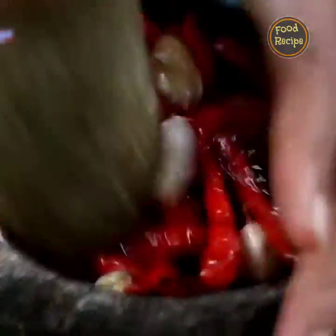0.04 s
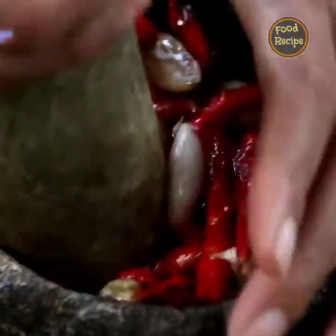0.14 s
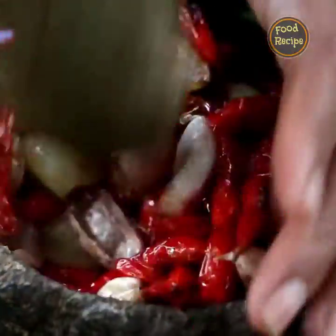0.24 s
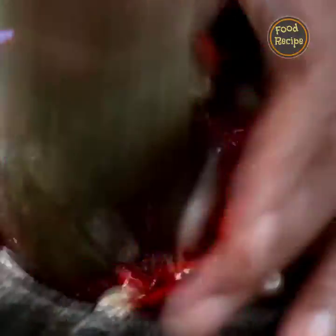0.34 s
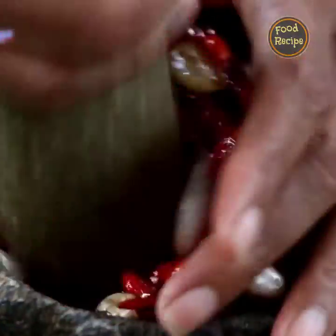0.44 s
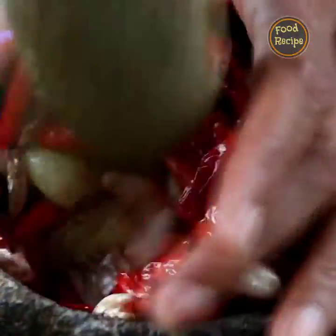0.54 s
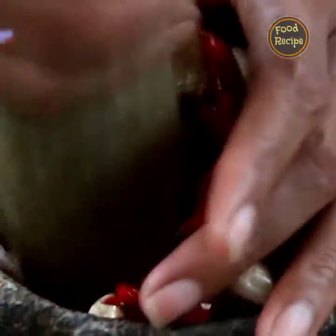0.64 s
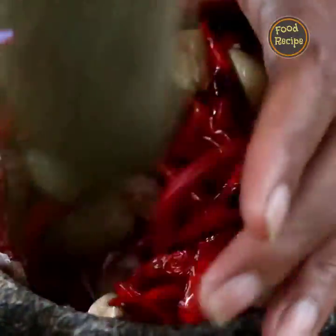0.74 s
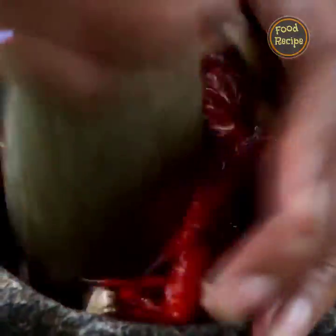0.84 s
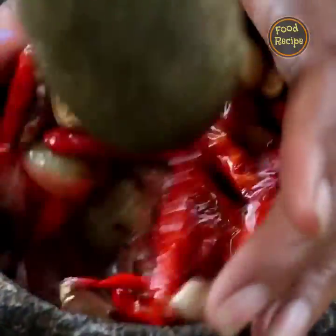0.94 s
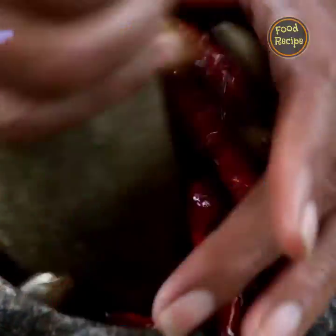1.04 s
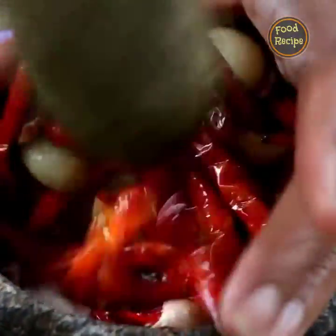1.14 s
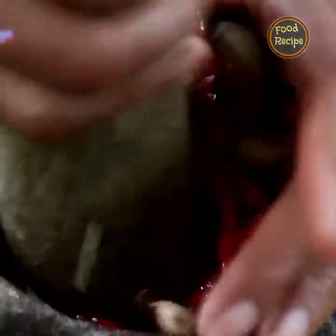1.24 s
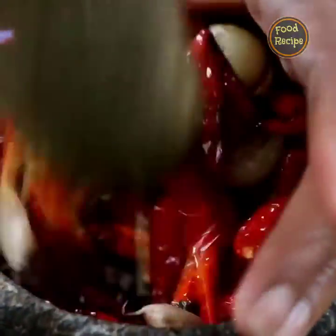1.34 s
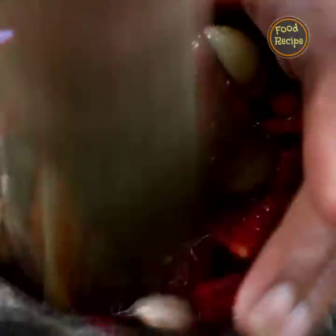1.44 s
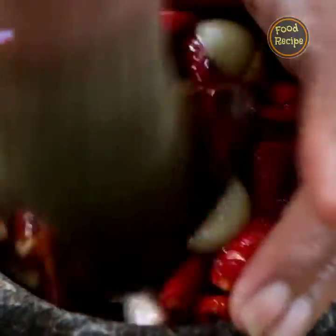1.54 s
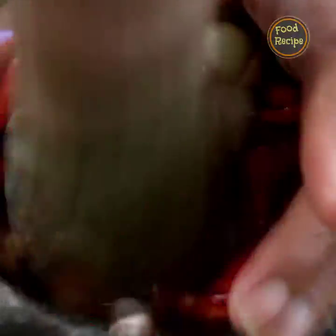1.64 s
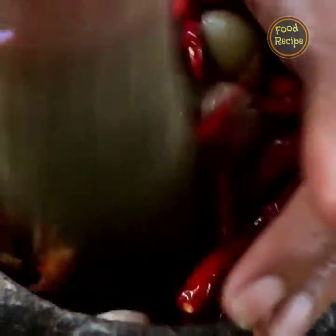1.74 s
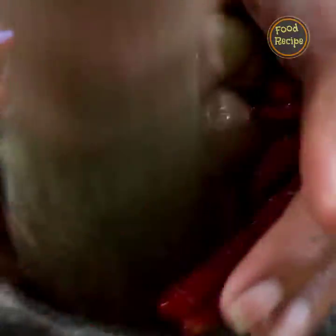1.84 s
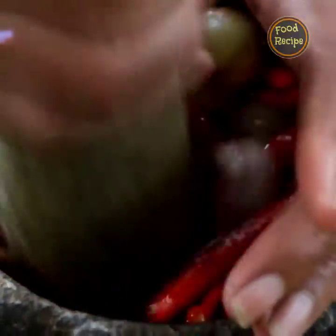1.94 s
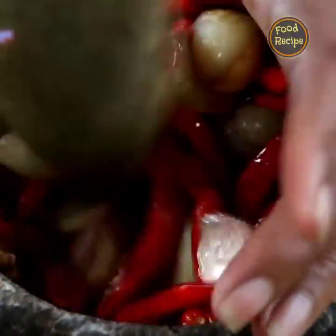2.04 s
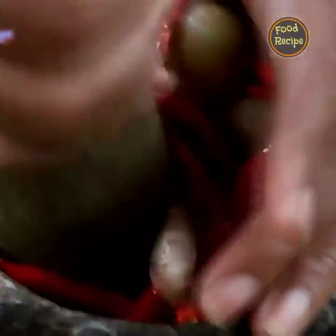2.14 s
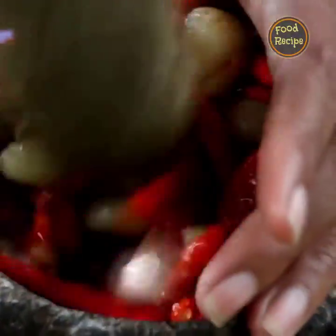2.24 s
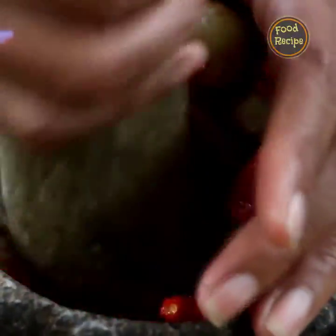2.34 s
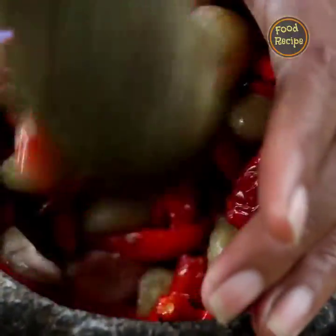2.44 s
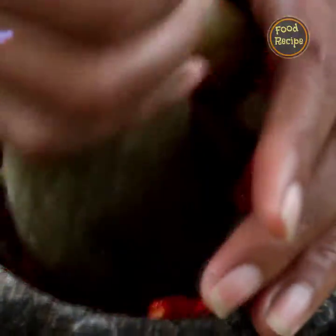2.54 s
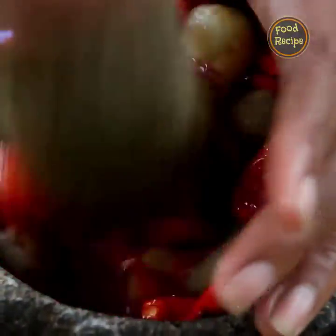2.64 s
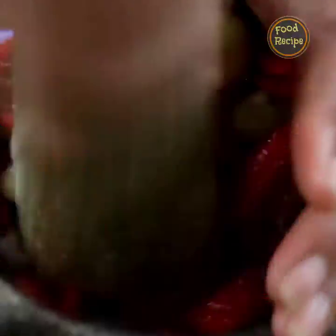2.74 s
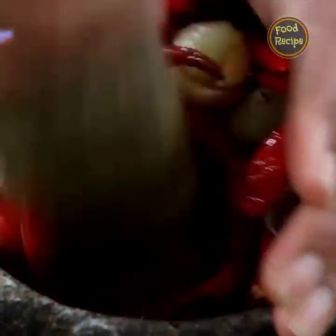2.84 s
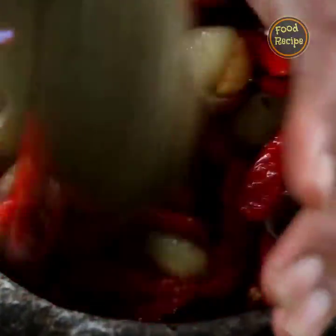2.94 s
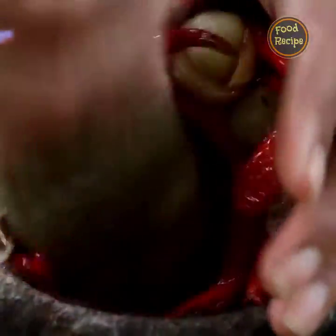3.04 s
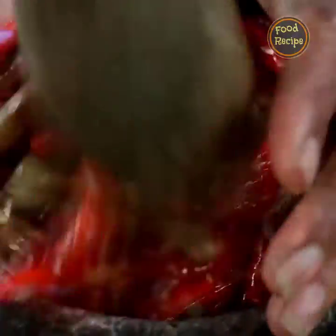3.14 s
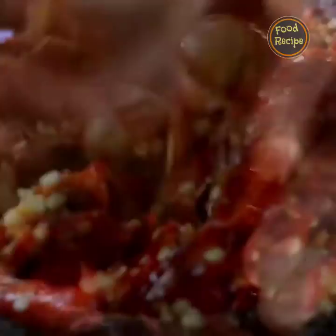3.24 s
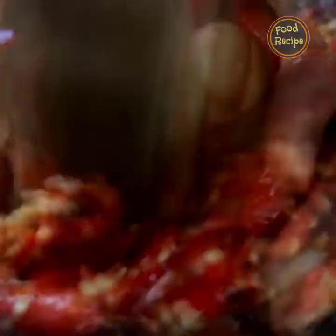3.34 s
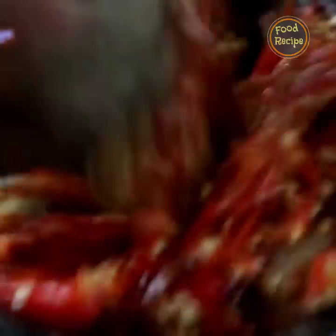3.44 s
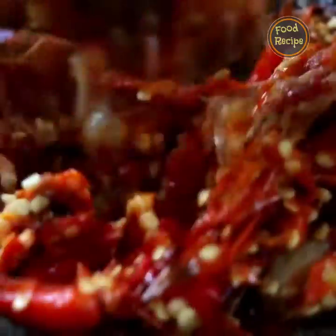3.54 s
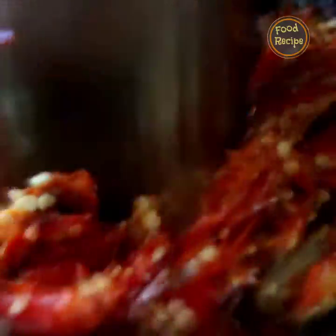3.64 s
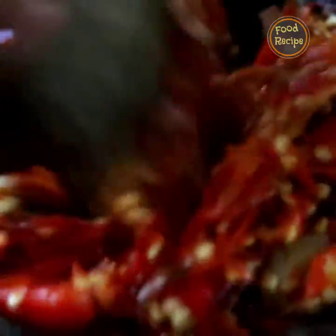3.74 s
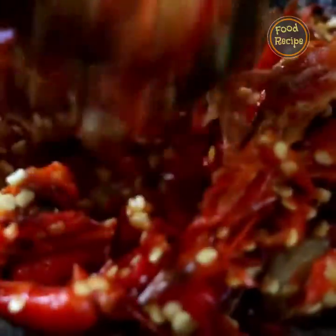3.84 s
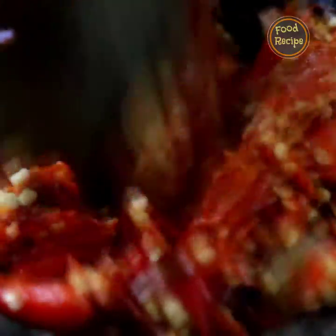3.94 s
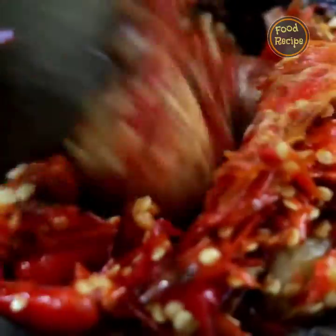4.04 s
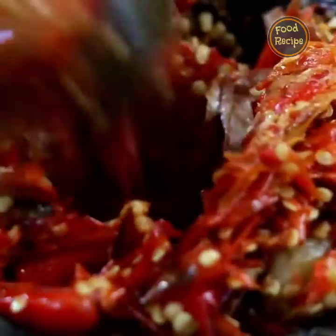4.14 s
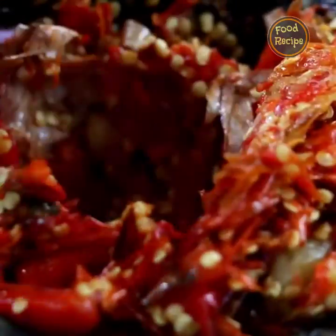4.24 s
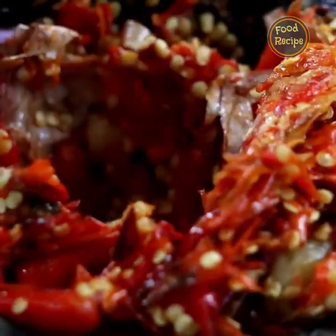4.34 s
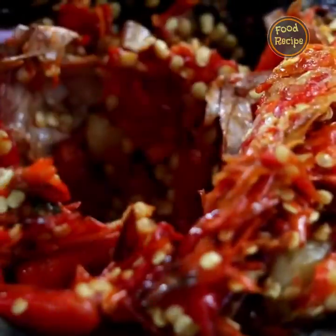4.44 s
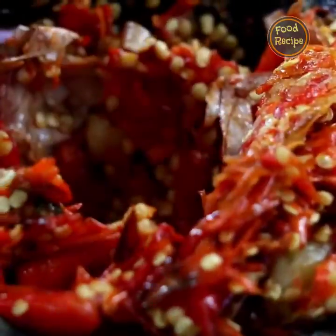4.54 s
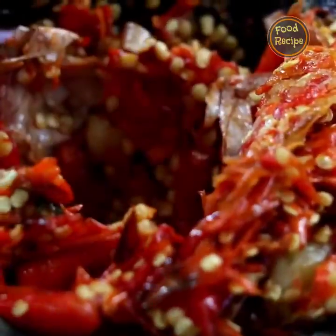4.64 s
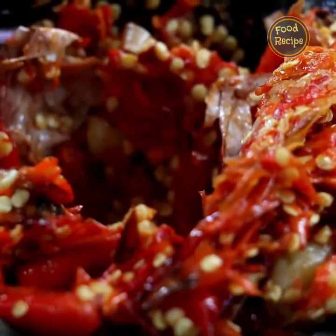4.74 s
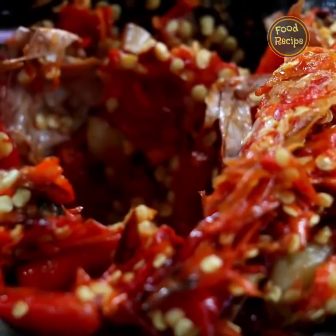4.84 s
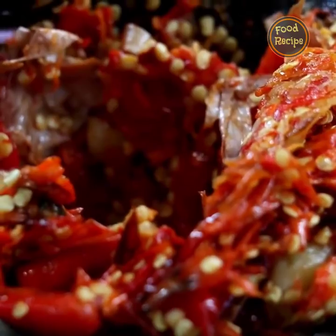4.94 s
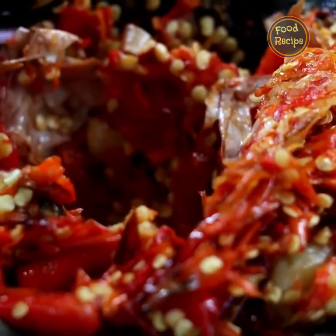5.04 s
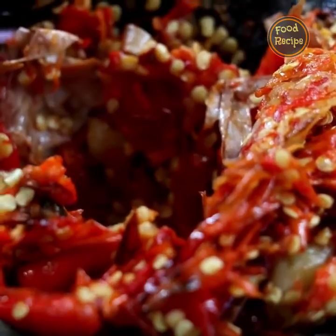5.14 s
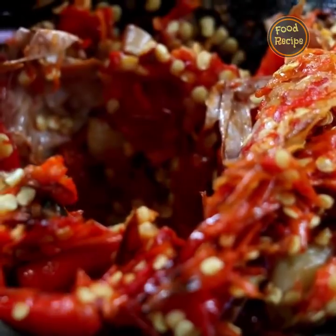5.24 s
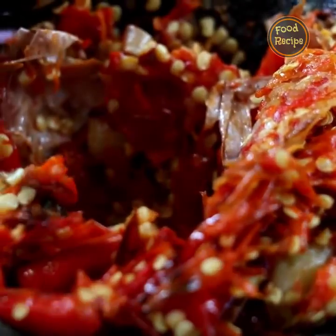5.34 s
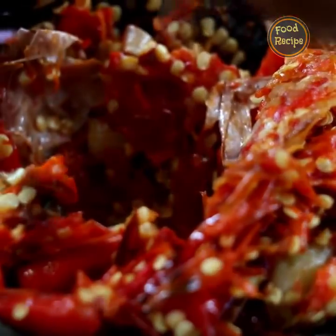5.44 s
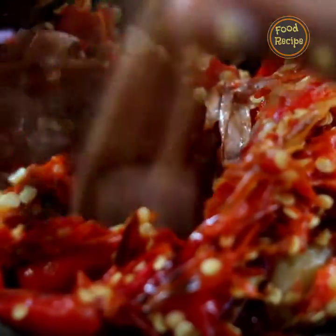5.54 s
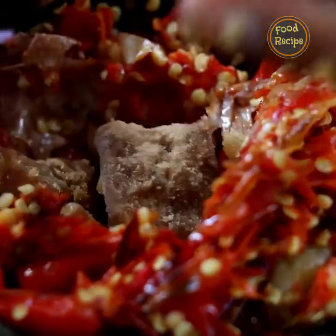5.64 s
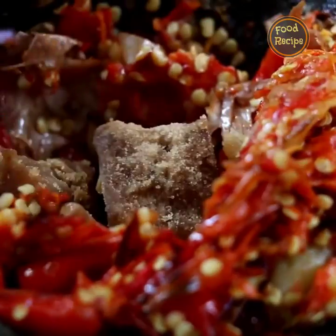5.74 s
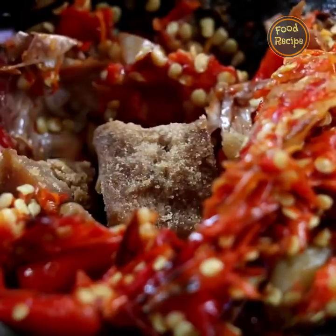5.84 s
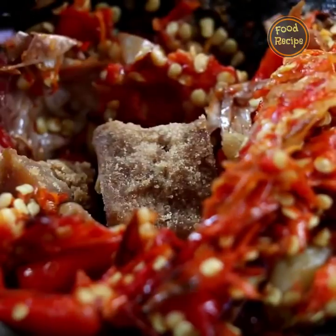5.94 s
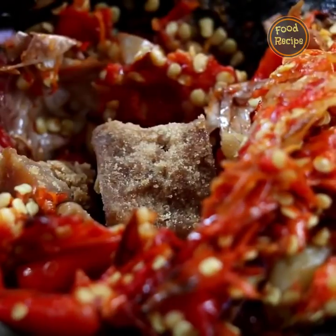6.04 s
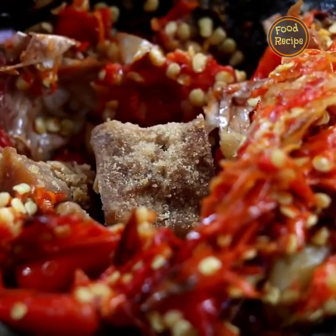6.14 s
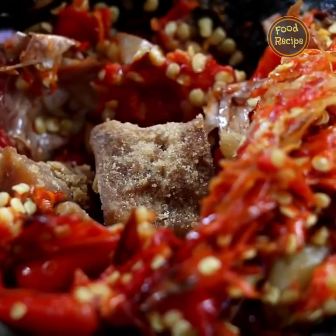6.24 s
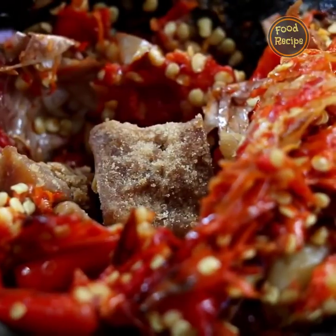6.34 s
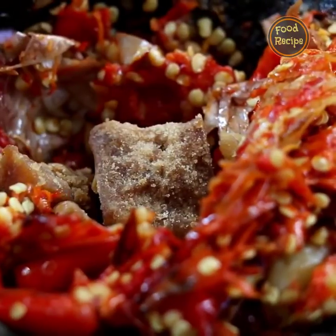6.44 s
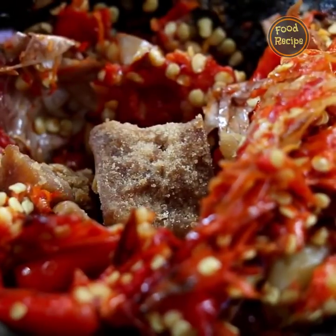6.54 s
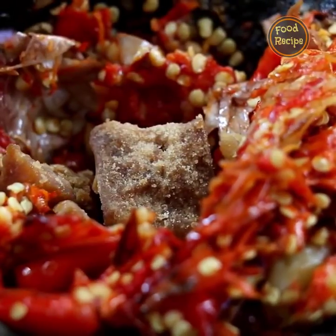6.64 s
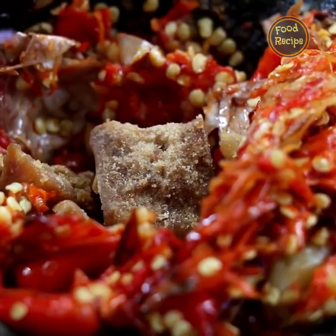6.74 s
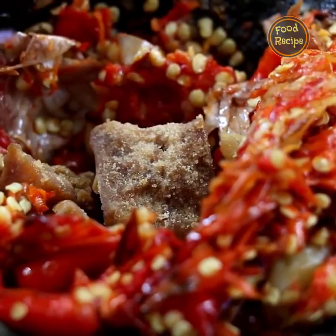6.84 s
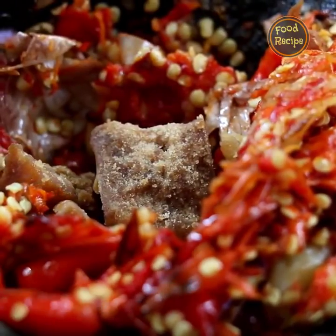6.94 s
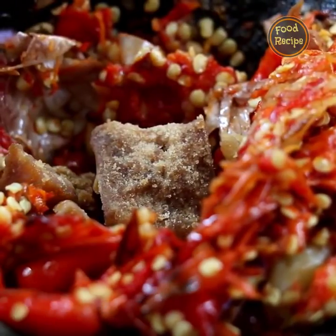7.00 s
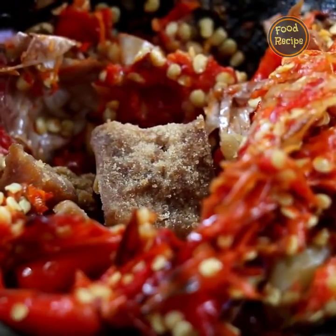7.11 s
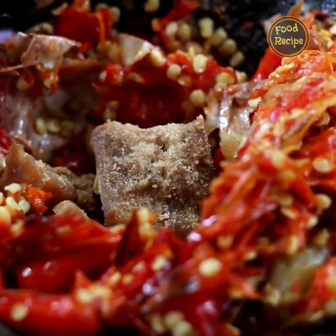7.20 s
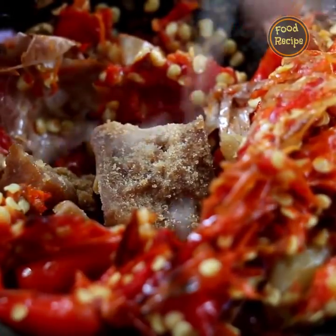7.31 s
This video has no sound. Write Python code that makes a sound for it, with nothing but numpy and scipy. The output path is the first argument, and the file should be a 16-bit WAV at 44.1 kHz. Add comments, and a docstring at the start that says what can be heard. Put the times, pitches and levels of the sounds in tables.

```python
"""Pounding chillies in a stone mortar

Close by and outdoors, a stone pestle pounds chillies and garlic. Each blow crushes skins and flesh
in a burst of tiny cracks and thumps the bowl on its base; where stone meets stone, it knocks.
Then two lumps of sugar drop in. Insects shrill and small birds call all around, over a soft hiss of air."""
import sys
import numpy as np
from scipy import signal
from scipy.fft import rfft, irfft
from scipy.io import wavfile

SR = 44100
rng = np.random.default_rng(int(sys.argv[2]) if len(sys.argv) > 2 else 0)


def unload_audio(sound):
    """Save the sound as a 16-bit wav file, at the path given as the first command line argument."""
    columns = np.transpose(np.atleast_2d(sound))
    # keep every value between -1 and 1, then stretch to whole-number steps
    steps = np.round(np.clip(columns, -1, 1) * 32767)
    wavfile.write(sys.argv[1], SR, steps.astype(np.int16))


N = 325017


# the tones of the filled stone bowl: f/Hz, level/dB, ring time before stretching/s
BOWL_TONES = [(520, -2, 0.0059), (843, -11.5, 0.0038), (1155, -2.5, 0.0046), (1460, 1.5, 0.0065),
              (2100, -6, 0.0051), (2840, 8.5, 0.0029), (4180, -2, 0.0059), (5200, -4, 0.0054),
              (6770, -12, 0.0019), (7860, -7.5, 0.0067), (12170, -14, 0.0051)]
def knock(db, bright_hz, narrow_db, stretch, spot_db=2.0, grit_db=-11, grit_s=.0003):
    """Stone on stone rings very briefly; the thinner the cushion of pulp, the brighter the knock."""
    t = np.arange(SR // 200) / SR
    grit = rng.standard_normal(len(t)) * np.exp(-t / grit_s)  # rough faces touch at many points
    contact = (t == 0) + amp(grit_db) * grit / np.linalg.norm(grit)
    spot = rng.standard_normal(len(BOWL_TONES))  # each spot of the bowl favours other tones
    tones = [(hz, tone_db + spot_db * luck, t60) for (hz, tone_db, t60), luck in zip(BOWL_TONES, spot)]
    ringing = np.convolve(contact, ring(tones, stretch, rise_cycles=1.2))
    sound = colour(ringing, lambda hz: -narrow_db * np.log1p(np.log2(hz / bright_hz) ** 2))
    return amp(db) * sound / abs(sound).max()


# blows that reach the stone: t/s, peak level/dB, favoured f/Hz, cut away from that pitch/dB,
# ring time stretch, bounce time/ms, level of the bounce's crunch/dB
STONE_HITS = [(0.5811, 2.5, 2580, 11.5, 0.79, 15, -45), (0.7863, -1, 2400, 4, 1.6, 12, -21.5),
              (1.013, -10, 1730, 13, 1.1, 4.9, -31), (1.4451, 5, 1580, 5, 1.25, 7.7, -25.5),
              (1.6589, -4.5, 1990, 15, 0.62, 7.9, -28), (1.869, -2.5, 2100, 11, 0.73, 9.8, -26.5),
              (2.5391, -9, 4970, 8, 0.36, 5.8, -48), (2.982, -11.5, 4070, 11, 0.57, 12, -56),
              (3.2045, -3.5, 6400, 14.5, 0.59, 8, -52), (3.356, -12.5, 2000, 6, .6, 9.1, -48),
              (3.4178, -22.5, 1200, 9, .62, 12, -34.5), (3.6464, -14, 620, 5, 0.41, 14, -46)]
def pestle_knocks(bounce_boost_db=7.5):
    """The pestle strikes the bowl, bounces and lands again more softly."""
    out = np.zeros(N)
    for s, db, bright_hz, narrow_db, stretch, bounce_ms, bounce_db in STONE_HITS:
        add(out, s, knock(db, bright_hz, narrow_db, stretch))
        landing = knock(bounce_db + bounce_boost_db, bright_hz=1450, narrow_db=7, stretch=1.2)
        add(out, s + bounce_ms / 1000, landing)
    return out


# how strong the crushing is at each pitch: f/Hz, level/dB
CRUNCH_COLOUR = [(100, -32.5), (380, -7.5), (900, -13.5), (1200, -7), (1480, 4), (1750, -2.5), (2080, 4.5),
                 (2500, -0.5), (3500, -0.5), (5800, 1), (8500, -2.5), (10500, -11.5), (16000, -17)]
def crunch(swell, db, tilt_db, cracks_per_s=5500, spread_db=4.5, clump_db=1.5, wall_hz=710):
    """Cells burst in clumps of tiny cracks as the swell presses them; more tilt means more treble."""
    n = len(swell)
    happens = rng.random(n) < cracks_per_s / SR
    size = amp(spread_db * np.minimum(rng.exponential(1, n), 3))
    direction = rng.choice([-1, 1], n)
    clumps = amp(clump_db * wander(n, per_s=497))
    cracks = swell * clumps * happens * direction * size
    cracks = cracks + 0.082 * np.roll(cracks, round(SR / wall_hz))  # the wall throws each crack back
    sound = colour(cracks, lambda hz: spectrum(CRUNCH_COLOUR, hz)
                   + tilt_db * np.log2(np.maximum(hz, 900) / 4000))
    return amp(db) * unit(sound) * np.sqrt(np.mean(swell ** 2))


# every blow: t/s, thump level before its boost/dB, crush level/dB, crush fade/ms,
# crush tilt/dB per octave, time to sink in/ms, skin level/dB, skin tilt/dB per octave
PESTLE_BLOWS = [(.3675, -53, -25, 7.5, 2, 9.1, -23.5, 4), (.5818, -42, -29, 6.2, 0, 3.2, -21, 2.5),
                (.7886, -38, -16.5, 1.6, 0, 9, -38, 3), (1.0127, -40.5, -18, 5, 7, 6.5, -22, 0),
                (1.235, -47, -21, 5.2, 5, 9.2, -29, -3), (1.4474, -33, -17, 2.3, 4, 3.6, -40, 12),
                (1.6595, -37, -29, 5, 5, 5.8, -30, -3.5), (1.8705, -39.5, -25.5, 1.4, -8.5, 12, -39, 9),
                (2.105, -44, -21.5, 2.4, 3, 17.5, -23, 7), (2.3191, -41, -22, 4.3, 0.5, 4, -26, 0),
                (2.5414, -33, -14.5, 2.1, 2, 4.3, -25, 2), (2.7637, -36, -26.5, 3.4, 6.5, 12.1, -33, -2),
                (2.9822, -32, -17, 1.74, 0, 8.5, -27.5, -2), (3.068, -37, -35.5, 3, 2, 3.5, -39, 0),
                (3.2042, -34.5, -11, 1.3, 8, 15.7, -31.5, 0.5),
                (3.3572, -23, -24, 2, -6.5, 3.03, -25.5, -4.5),
                (3.4185, -45, -34, 5.3, -3.5, 5.2, -31.5, 5), (3.6463, -18.5, -21.5, 1.5, -3, 3.5, -22, -6)]
# pieces that shift and snap: t/s, level/dB, half length/ms, tilt/dB per octave
LOOSE_PIECES = [(.05, -42.5, 16, 8), (.091, -39.5, 19.3, 3.5), (.197, -42.5, 10, 1),
                (0.352, -31.5, 3.7, 13), (1.1303, -29.5, 0.53, 6.5), (2.304, -33, .7, 3),
                (3.969, -44, 12, -2), (5.132, -43, 1.7, 3), (5.552, -45, 1.7, 4.5)]
def crushing(skin_attack_s=0.00062, skin_release_s=.012, lift_delay_s=.072, lift_fall_db_per_s=4.5):
    """Each blow bursts skins, crushes flesh and lifts out; bounces and loose pieces crackle too."""
    out = np.zeros(N)
    t = np.arange(-SR // 16, SR // 16) / SR
    for s, _, crush_db, fade_ms, tilt_db, sink_ms, skin_db, skin_tilt_db in PESTLE_BLOWS:
        start, sink_s = s + t[0], sink_ms / 1000
        skins = .5 * (1 + np.tanh(t / skin_attack_s))  # skins burst at first touch,
        skins *= np.exp(-np.maximum(t, 0) / (0.84 * sink_s))  # give way as the pestle sinks
        skins *= np.exp(-np.maximum(t - sink_s, 0) / skin_release_s)  # and fall silent once it stops
        add(out, start - sink_s, crunch(skins, skin_db, skin_tilt_db))
        flesh = np.exp(-abs(t) / (fade_ms / 1000))
        add(out, start, crunch(flesh, crush_db, tilt_db))
        lift_db = -45.5 - lift_fall_db_per_s * s  # leaving the wet pulp gets quieter as skins break up
        lift = crunch(bell(t, half_s=0.014), lift_db, tilt_db=2.5, cracks_per_s=2600)
        add(out, start + lift_delay_s, lift)
    for s, *_, bounce_ms, bounce_db in STONE_HITS:
        flight_s = bounce_ms / 1000
        smear = crunch(bell(t, 0.31 * flight_s), bounce_db, tilt_db=3)
        add(out, s + t[0] + flight_s, smear)
    for s, db, half_ms, tilt_db in LOOSE_PIECES:
        add(out, s + t[0], crunch(bell(t, half_ms / 1000), db, tilt_db, cracks_per_s=3000))
    return out


# the low tones of the mortar rocking on its base: f/Hz, level/dB, ring time/s
BASE_TONES = [(201, -0.5, 0.056), (162.6, -6.5, 0.043), (332, 2.5, 0.014), (580, -3, 0.018)]
def bowl_thumps(rise_s=0.0046, boost_db=6, lag_s=0.0013):
    """Each blow pushes the heavy bowl into its base, which springs back for a few swings."""
    out = np.zeros(N)
    t = np.arange(SR // 6) / SR
    thump = sum(amp(db - 60 * t / t60) * np.sin(2 * np.pi * hz * t) for hz, db, t60 in BASE_TONES)
    thump *= 1 - np.exp(-t / rise_s)
    for s, db, *_ in PESTLE_BLOWS:
        add(out, s + lag_s, amp(db + boost_db) * thump)
    return out


# lumps of sugar landing: t/s, peak level/dB
SUGAR_DROPS = [(5.5101, -24.5), (5.5845, -30.5)]
# the tones of a lump's dry tap: f/Hz, level/dB, ring time before stretching/s
SUGAR_TONES = [(1220, -8.5, 0.021), (2060, 7.5, 0.012), (2530, -3.5, 0.017), (3700, 2, 0.0064),
               (5500, 0.5, 0.0062)]
def sugar_lumps():
    """Hard lumps tap on the bottom of the bowl."""
    out = np.zeros(N)
    tap = ring(SUGAR_TONES, stretch=0.63, rise_cycles=2.6)
    for s, db in SUGAR_DROPS:
        add(out, s, amp(db) * tap / abs(tap).max())
    return out


# single bird whistles: t/s, length/s, first f/Hz, last f/Hz, level/dB
BIRD_WHISTLES = [(.3, .18, 451, 442, -61.5), (.52, .15, 2220, 2115, -56), (.725, .05, 4720, 4800, -54),
                 (0.973, 0.55, 5200, 5050, -62.5), (1.202, 0.064, 2130, 2100, -43),
                 (1.43, 0.12, 5330, 5190, -48), (3.572, 0.077, 3700, 4200, -49.5),
                 (3.795, .05, 3600, 4950, -52), (3.831, 0.036, 1650, 1660, -53.5),
                 (3.988, 0.067, 1990, 1940, -53), (4.471, 0.019, 3090, 2296, -50),
                 (4.746, 0.036, 4950, 4640, -52), (4.884, 0.071, 4210, 4810, -53.5),
                 (6.772, .02, 3300, 2900, -53)]
def birds(first_chip_s=3.268, every_s=.2254, chip_s=.031, chip_db=-45.5, pip_delay_s=.135, pip_db=-58):
    """One bird repeats a quick falling chip with a faint pip after it; others whistle now and then."""
    out = np.zeros(N)
    for s in np.arange(first_chip_s, N / SR, every_s):
        chip = glide(chip_s, 6450, 4100, waver_hz=164)
        chip *= np.linspace(.2, 1.3, len(chip))
        add(out, s - 0.64 * chip_s, amp(chip_db + .5 * rng.standard_normal()) * chip)
        pip = rng.random() * glide(0.021, 3750, 3562.5, waver_hz=35.3)
        add(out, s + pip_delay_s, amp(pip_db) * pip)
    for s, length, first_hz, last_hz, db in BIRD_WHISTLES:
        add(out, s, amp(db) * glide(length, first_hz, last_hz, waver_hz=35))
    return echoes(out, t60=0.08, wet_db=-6.5)


# near insects, each repeating one note: from t/s, until t/s, time between notes/s, note length/s,
# starting f/Hz, pitch drop/Hz per s, level/dB
NEAR_INSECTS = [(.28, 1.6, .238, .44, 9520, 950, -54), (3.36, 6.7, .325, .48, 9580, 500, -55),
                (3.27, 4.9, .385, .5, 9080, 650, -48), (2.9, 5.2, .365, .5, 8700, 330, -53),
                (6.55, 6.6, .4, .4, 8950, 850, -55)]
def singing_insects(scatter_hz=18, uneven_db=3.8, fade_db=8,
                    far_count=40, far_note_s=0.47, far_drop_hz_per_s=550, far_db=-60):
    """Insects near and far sing thin, overlapping notes with their wings, each sagging in pitch."""
    out, notes = np.zeros(N), []
    for first_s, last_s, every_s, length, hz, drop, db in NEAR_INSECTS:
        for s in np.arange(first_s, last_s, every_s):
            notes.append((s, length, hz + scatter_hz * rng.standard_normal(), drop, db))
    for k, (when, pitch) in enumerate(rng.random((far_count, 2))):
        s = (k + when - 1) / far_count * N / SR
        hz = 8880 + 260 * (2 * pitch - 1)
        notes.append((s, far_note_s, hz, far_drop_hz_per_s, far_db))
    for s, length, hz, drop, db in notes:
        note = glide(length, hz, hz - drop * length, waver_hz=24)
        press_db = uneven_db * wander(len(note), per_s=35)  # the wings press unevenly,
        ease_db = fade_db * np.linspace(.5, -.5, len(note))  # then ease off
        add(out, s, amp(db + press_db + ease_db) * note)
    return echoes(out, t60=0.3, wet_db=-11)


def rasping_insect(first_s=3.485, every_s=.1209, slowing_s=.0011, stroke_s=0.05, db=-56, count=29):
    """One insect rasps in short, hissy strokes, slowing a little with each one."""
    strokes = np.zeros(N)
    for k in range(count):
        s = first_s + every_s * k + slowing_s * k ** 2 / 2
        stroke = amp(2 * rng.standard_normal()) * np.hanning(int(stroke_s * SR))
        add(strokes, s - stroke_s / 2, stroke)
    return amp(db) * strokes * noise([(7100, -50), (7550, -1), (7850, -12), (8300, -35)])


# the shrill of the far chorus: f/Hz, level/dB
CHORUS_COLOUR = [(7000, -23.5), (8000, -5.5), (8500, -9), (8950, 2), (9200, -4), (9500, -13), (9680, -55)]
# its loudness over time: t/s, level/dB
CHORUS_LOUDNESS = [(0, -56.5), (1.5, -57), (2.7, -56), (3.6, -54.5), (5, -59), (7.3, -52.5)]
# the shrill of a second swarm: f/Hz, level/dB
SWARM_COLOUR = [(7800, -38), (8250, -5), (8480, -2), (8770, -0.5), (8900, 4), (9100, -36.5)]
# its loudness over time: t/s, level/dB
SWARM_LOUDNESS = [(2.8, -77), (4, -63), (5.2, -55), (5.7, -52), (7.3, -56.5)]
def insect_chorus():
    """Many far insects blur into one high hiss, and a second swarm joins in."""
    chorus = level(CHORUS_LOUDNESS) * noise(CHORUS_COLOUR)
    swarm = level(SWARM_LOUDNESS) * noise(SWARM_COLOUR)
    return chorus + swarm


def far_birds(count=110, call_db=-66):
    """Faint peeps from far away, lower ones longer, blurred by the distance."""
    out = np.zeros(N)
    for when, pitch, slide, size in rng.random((count, 4)):
        hz = 1100 * 3.6 ** pitch
        call = glide(70 / hz, hz, hz * (1.03 - .06 * slide), waver_hz=30)
        add(out, when * N / SR, amp(call_db) * (.5 + size) * call)
    return echoes(out, t60=.15, wet_db=-7)


# the hiss of outdoor air: f/Hz, level/dB
AIR_COLOUR = [(22, 14.5), (60, 2), (150, 1), (450, -0.5), (800, 1.5), (1400, 2), (2050, 4.5), (3000, -0.5),
              (5500, 1), (7000, -2.5), (10000, -4), (12000, -6.5), (13000, -14.5), (14500, -4), (15700, -7)]
# its loudness over time: t/s, level/dB
AIR_LOUDNESS = [(0, -54.5), (3.8, -54.5), (4.3, -56.5), (7.3, -56.5)]
def air(rumble_db=-78, gust_db=3):
    """Soft outdoor hiss over a low, lumpy rumble of moving air."""
    gusts = amp(rumble_db + gust_db * wander(N, per_s=5))
    rumble = gusts * noise([(22, 8), (35, -4), (70, -21), (150, -26), (400, -62)])
    return level(AIR_LOUDNESS) * noise(AIR_COLOUR) + rumble


def ring(tones, stretch, rise_cycles):
    """Tones that swell, high ones first, and die away by 60 dB in their ring time (t60) times stretch."""
    t = np.arange(SR // 16) / SR
    out = np.zeros(len(t))
    for hz, db, t60 in tones:
        rise = 1 - np.exp(-t * hz / rise_cycles)
        out += amp(db - 60 * t / (t60 * stretch)) * np.cos(2 * np.pi * hz * t) * rise
    return out


def glide(length_s, first_hz, last_hz, waver_hz):
    """A soft-edged tone that slides unsteadily from one pitch to another."""
    n = int(length_s * SR)
    hz = np.linspace(first_hz, last_hz, n) + waver_hz * wander(n, per_s=120.2)
    return np.sin(2 * np.pi * np.cumsum(hz) / SR) * np.sin(np.linspace(0, np.pi, n))


def echoes(x, t60, wet_db, dull_hz=8000):
    """Adds a scatter of duller echoes at the level wet_db, fading by 60 dB in t60 seconds."""
    t = np.arange(SR // 2) / SR
    tail = rng.standard_normal(len(t)) * amp(-60 * t / t60) * (1 - np.exp(-t / 0.002))
    tail = colour(tail, lambda hz: -10 * np.log10(1 + (hz / dull_hz) ** 4))
    return x + amp(wet_db) * signal.fftconvolve(x, tail / np.linalg.norm(tail))[:N]


def colour(x, db_at, size=2048):
    """Turns each pitch up or down by db_at(Hz), with nothing sounding before its cause."""
    hz = abs(np.fft.fftfreq(size, 1 / SR)) + 1
    log_gain = np.log(amp(np.maximum(db_at(hz), -90)))
    taps = np.fft.ifft(np.exp(np.conj(signal.hilbert(log_gain)))).real
    return signal.fftconvolve(x, taps[:size // 2])[:len(x)]


def noise(points, top_hz=15750):
    """Steady noise of strength 1, shaped by (f/Hz, level/dB) points."""
    hz = np.fft.rfftfreq(N, 1 / SR)
    gain = amp(spectrum(points, hz)) * (hz < top_hz)
    return unit(irfft(rfft(rng.standard_normal(N)) * gain, N))


def wander(length, per_s):
    """A random drift of size about 1 that turns per_s times a second."""
    turns = rng.standard_normal(int(length * per_s / SR) + 2)
    return np.interp(np.arange(length) * per_s / SR, np.arange(len(turns)), turns)


def bell(t, half_s):
    """A smooth swell around time zero."""
    return np.exp(-.5 * (t / half_s) ** 2)


def spectrum(points, hz):
    """Joins (f/Hz, level/dB) points into a curve and reads it at hz."""
    f, db = np.transpose(points)
    return np.interp(np.log(hz + 1), np.log(f), db)


def level(points):
    """Turns (t/s, level/dB) points into a gain for every sample."""
    return amp(np.interp(np.arange(N) / SR, *np.transpose(points)))


def amp(db):
    """Turns decibels into a gain to multiply by."""
    return 10 ** (np.asarray(db) / 20)


def unit(x):
    """Scales a sound to an average strength (rms) of 1."""
    return x / np.sqrt(np.mean(x ** 2) + 1e-20)


def add(mix, s, sound):
    """Mixes a sound in, starting at s seconds."""
    start = round(s * SR)
    sound = sound[max(-start, 0):]
    part = mix[max(start, 0):][:len(sound)]
    part += sound[:len(part)]


def scene():
    """All is heard from one spot; only a faint low rumble differs between the ears."""
    knocks = echoes(pestle_knocks(), t60=.04, wet_db=-28.5)
    crunches = echoes(crushing(), t60=0.13, wet_db=-24)
    mortar = echoes(knocks + crunches + bowl_thumps() + sugar_lumps(), t60=0.11, wet_db=-27)
    mid = mortar + birds() + far_birds() + rasping_insect() + insect_chorus() + air() + singing_insects()
    side = amp(-72) * noise([(25, -4), (100, -7), (350, -10.5), (900, -12), (2500, -41)])
    return np.array([mid + side, mid - side])


def record(dry, top_hz=16450):
    """The hardest knocks have their peaks clipped flat; then the highest treble is cut away."""
    clipped = np.clip(dry, -1, 1)
    low_pass = signal.firwin(255, top_hz, window=("kaiser", 8), fs=SR)
    return signal.oaconvolve(clipped, low_pass[None], "same")


dry = scene()
out = record(dry)
unload_audio(out)
```